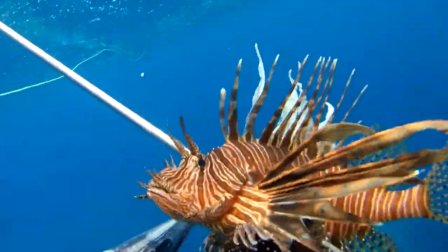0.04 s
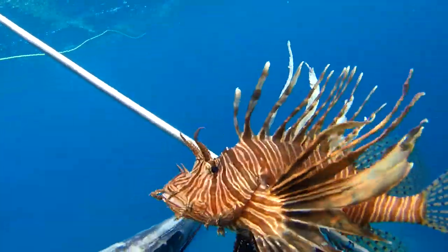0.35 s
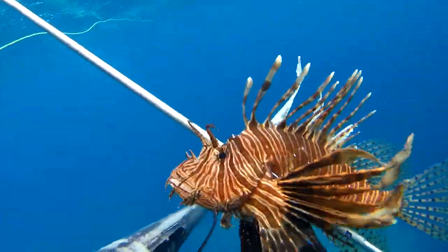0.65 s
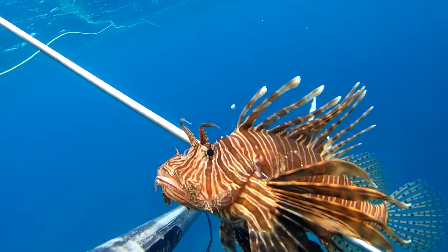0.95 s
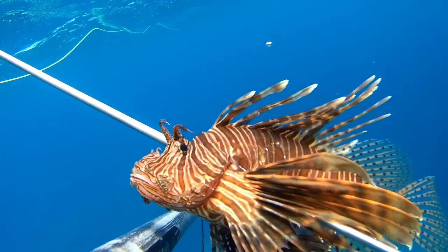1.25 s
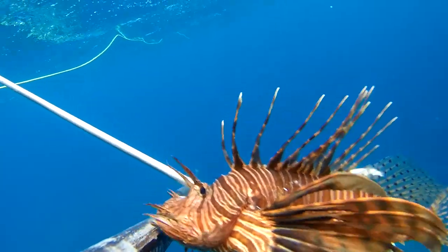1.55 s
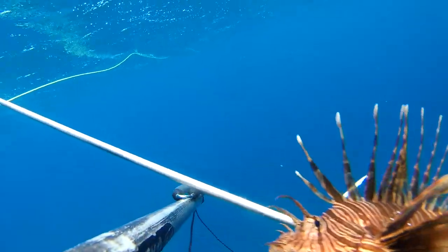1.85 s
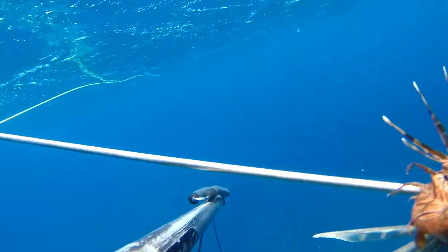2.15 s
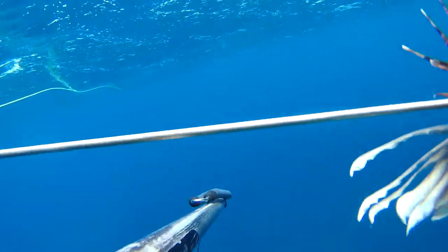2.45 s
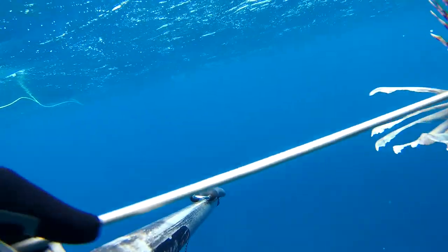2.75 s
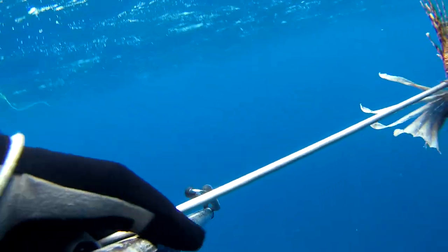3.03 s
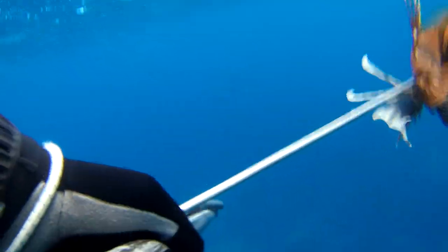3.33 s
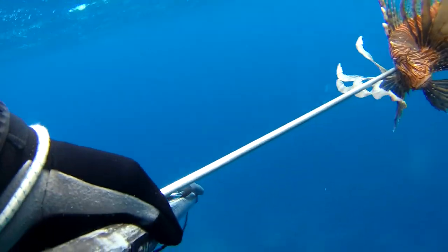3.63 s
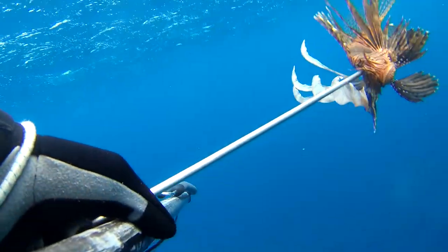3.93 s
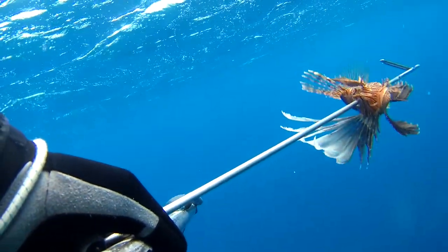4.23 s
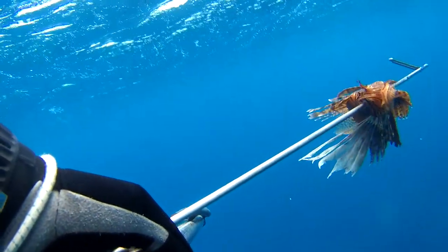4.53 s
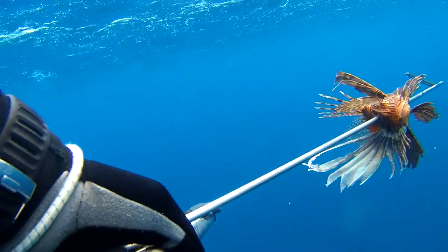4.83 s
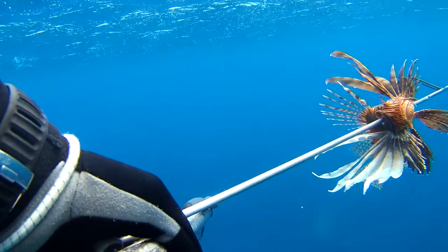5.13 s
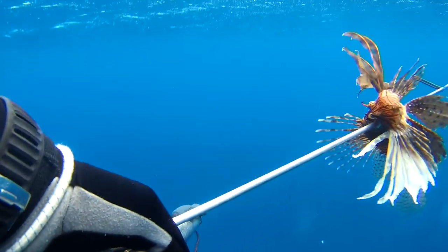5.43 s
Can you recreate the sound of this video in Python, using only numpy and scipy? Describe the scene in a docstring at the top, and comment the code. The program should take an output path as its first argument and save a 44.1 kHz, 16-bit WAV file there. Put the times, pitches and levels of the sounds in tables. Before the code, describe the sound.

The sound is close and muffled, heard under water from inside a camera housing, with a soft wash of water throughout. A handled speargun gives separate short, slightly ringing knocks at about 0.2, 1.2, 1.7 and 2.5 seconds, with faint rubbing between. At 2.8 and 2.9 seconds a steel spear clanks twice on the gun and starts scraping along it in small gritty slips with brief creaks. The water swells from 3 to 4 seconds. At 3.3 seconds comes the loudest knock, briefly overloading the microphone, with a deep thump and wobble from the camera mount. Quick knocks, scrapes, low thuds and a few bright clicks continue until about 4.2 seconds. A small bubble blips at 4.4. Another cluster of hard, dry clacks runs from 4.5 to 4.9 seconds. Then it eases to faint scraping, with a lighter knock and a low thud near 5.4 seconds.

```python
"""A speargun knocks under water as a diver handles it and a steel spear with a fish on it.
Each knock is a short crack plus the gun's own ringing tones. The spear clanks twice on the gun,
then scrapes along it in many tiny slips. Shoves sway the mount of a nearby camera housing, and the
biggest hits overload the microphone inside. Behind this come a few bright clicks, loose fittings
rattle faintly, three bubbles ring and water washes round the housing."""
import sys
import numpy as np
from scipy import signal
from scipy.fft import rfft, irfft, next_fast_len
from scipy.io import wavfile

SR = 44100
rng = np.random.default_rng(int(sys.argv[2]) if len(sys.argv) > 2 else 0)


def master(y):
    """Save y as 16-bit WAV."""
    cut = np.clip(np.atleast_2d(y).T, -1, 1)
    pcm = np.round(cut * 32767)  # scale
    wavfile.write(sys.argv[1], SR, pcm.astype(np.int16))


N = 246078
T = np.arange(N) / SR

# A mode is a tone that an object rings at. A fade time (t60) is how long a sound takes to drop 60 dB.
# The modes of the gun and of the spear. Each row: pitch in Hz, base fade time in seconds,
# relative level in dB when hit in the middle, relative level in dB when hit at the end.
GUN_MODES = [(125, 0.43, -13.5, -13), (186.3, 0.35, -9, -9.5), (258.8, 0.11, -4.5, 0), (310, 0.1, -7, 0),
             (453.5, 0.24, -5, -5), (561.5, 0.28, -19.5, -15.5), (664, 0.11, -17.5, -5),
             (708.6, 0.064, 0.5, -2), (851.6, 0.068, 5.5, 6.5), (943, 0.067, -0.5, 2),
             (1170, 0.067, -15, 5), (1340, 0.056, 6.5, -20.5), (1420, 0.04, -49, 12.5),
             (1509, 0.045, 10.5, -47), (1600, 0.04, 3, 3.5), (1985, 0.03, 3.5, -4.5),
             (2163, 0.019, 11, -2.5), (2730, 0.034, -6, -9.5), (3068, .21, -19, -28),
             (3780, 0.15, -31.5, -39), (3610, 0.056, -15, -42.5), (4100, 0.043, -18.5, -51.5)]
SPEAR_MODES = [(117, 0.41, -18, -15), (268.6, 0.14, -2, -16.5), (444.5, 0.3, -9.5, -26),
               (552, 0.26, -14.5, -18), (609.4, 0.12, -0.5, -13), (705.3, 0.09, 9.5, -32.5),
               (700.6, 0.038, -19, -0.5), (831.4, 0.13, 1, 6), (1090, 0.037, -24.5, -1),
               (1192, 0.078, 7, -84), (1395, .08, -13.5, -8.5), (1522, 0.096, 6.5, -7),
               (1699, 0.07, -21.5, -2), (1854, 0.049, 7, -28.5), (2022, 0.044, -41.5, 7.5),
               (2100, 0.11, -53.5, -15.5), (2291, 0.026, 0, 3), (2556, 0.035, -10, -21.5),
               (2682, 0.032, -5, -18), (2880, 0.24, -61, -34), (3696, 0.074, -5, -14.5),
               (4000, 0.082, -29.5, -25), (4157, 0.089, -25.5, -27), (5270, 0.13, -41, -45)]
# Knocks on the gun, plus one crack of scraping that breaks through the overload at 3.345 s.
# Each row: start in seconds, level in dB, place (0 middle, 1 end), grip (0 free, 1 tight),
# crack pitch in Hz.
GUN_CRACKS = [(.091, -39, 0.58, 0.67, 1190), (.217, -43, 0.0026, 0.29, 1500),
              (0.2442, -12.5, 0, 0.14, 1430), (.274, -42, 0.89, 0, 1300), (.350, -36.5, 0.35, 0.16, 1360),
              (1.142, -30, 0.32, 0.62, 800), (1.2259, -22, 0.96, 0.0045, 1330),
              (1.329, -38.5, .9, 0.077, 1250), (1.698, -25, 0.93, 0, 1190), (1.822, -42, 0.82, 0.91, 643),
              (2.23, -49.5, 0.96, 0, 1390), (2.274, -47.5, .84, 0, 1390), (2.372, -46.5, 0.52, 0, 1290),
              (2.5191, -15.5, 0.027, 0.11, 1510), (2.555, -39, 0.51, 0, 1300),
              (3.247, -31, 0.91, 0.48, 1560), (3.3139, 6.5, 0.21, 0.39, 1520),
              (3.3451, -5.5, 0.37, 0.88, 1490), (3.363, -5.5, .86, 0.28, 810),
              (3.4205, -20.5, .19, 0.19, 1990), (3.466, -25.5, 0.61, 0.13, 1800),
              (3.565, -11.5, 0.43, 0.37, 1910), (3.6789, -22, .37, 0.068, 1620),
              (3.754, -9.5, 0.27, 0.77, 360), (3.815, -24.5, 0.12, 0.49, 2630),
              (4.046, -20.5, 0, 0.71, 2030), (4.0788, -12.5, 0.44, 0.4, 1600),
              (4.5307, -24.5, 0, 0.78, 2300), (4.5522, -12.5, 1, 0.8, 1270), (4.5984, -6, 0, 1, 884),
              (4.625, -18.5, 0.8, 0.34, 1820), (4.755, -16, 0.18, 0.96, 1750),
              (4.8591, -8, 0.036, 0.96, 620), (4.8669, -2.5, 0.65, 0.68, 1640),
              (4.917, -26.5, 0.77, 1, 530), (5.367, -37, .7, 0.39, 875), (5.4129, -19.5, 0.96, 0.26, 1210)]
# Spear hits: two loud, one faint. Each row: start in seconds, ring level in dB, place (0 middle, 1 end),
# ring time multiplier, crack level in dB, crack pitch in Hz, crack fade time in seconds.
SPEAR_CLANKS = [(2.7932, -4.5, 0.051, 0.79, 2.5, 1790, 0.045), (2.9252, -6, 0.9, 1.04, -14, 1730, 0.073),
                (2.985, -28, 0.6, 2.8, -32.5, 5340, 0.053)]
# Slides of the spear along the gun. Each row: start in seconds, length in seconds, level in dB,
# treble cutoff in Hz (higher when the spear bites harder).
SCRAPE_STROKES = [(1.138, 0.1, -49, 1150), (2.04, 1, -54.5, 1240), (2.8, 0.065, -23, 2010),
                  (2.96, 0.11, -28.5, 2130), (3.103, 0.15, -39, 1770), (3.345, 0.08, -26, 3740),
                  (3.43, 0.085, -41, 2000), (3.485, 0.12, -31, 3060), (3.602, 0.032, -27, 2600),
                  (3.628, 0.041, -30, 4200), (3.668, 0.078, -33, 1490), (3.754, 0.047, -36.5, 4100),
                  (3.846, 0.091, -47.5, 3020), (3.893, 0.078, -33.5, 4400), (3.973, 0.039, -39.5, 3500),
                  (4.039, 0.19, -44, 2620), (4.199, 0.088, -41, 2940), (4.421, 0.093, -43, 2200),
                  (4.5, 0.27, -48.5, 1880), (4.926, 0.19, -53, 2310), (5.043, 0.066, -47.5, 2770),
                  (5.243, 0.068, -51.5, 5420), (5.287, .1, -57, 3080), (5.519, 0.085, -45, 2880)]
# Groans where the grip sticks and slips. Each row: start and length in seconds, level in dB, pitch in Hz.
GRIP_GROANS = [(0, 0.055, -56, 304), (1.134, 0.12, -43, 624), (1.138, 0.088, -56, 2680),
               (1.431, 0.067, -51.5, 593), (2.059, 0.11, -48, 662), (2.18, 0.25, -57.5, 420),
               (2.83, 0.039, -32.5, 255), (2.983, .1, -31, 787), (3.134, 0.034, -30, 780),
               (3.361, .04, -18.5, 495), (3.554, 0.043, -22.5, 445), (3.635, 0.025, -26, 1720),
               (3.894, 0.11, -31, 437), (4.202, 0.093, -46, 900)]
# Shoves on the mount. Each row: start in seconds, level in dB, length of the push in seconds.
MOUNT_SHOVES = [(3.3065, 12, .0115), (3.3455, 1, .018), (3.553, -10, .014), (3.588, -11, .012),
                (3.775, -9, .013), (3.812, -16, .012), (3.975, -16, .018), (4.555, -17, .022),
                (4.599, -19, .004), (4.729, -21, .014), (4.86, -17, .005), (4.872, -17, .018),
                (5.4605, -7, .011)]
# Short, bright clicks; the one at 2.985 s is the sharp edge of the faint spear hit.
# Each row: start in seconds, level in dB.
BRIGHT_CLICKS = [(.364, -46.5), (1.63, -42), (2.736, -46), (2.985, -49), (3.111, -40.5), (3.392, -21),
                 (3.583, -29.5), (4.521, -36), (5.219, -41)]
# Bubbles shaken loose. Each row: start in seconds, level in dB, first pitch in Hz, fade time in seconds.
LOOSE_BUBBLES = [(0.508, -45, 500, 0.013), (0.761, -33.5, 351, 0.045), (4.403, -19, 323, 0.022)]
# How hard the diver's movement drives water past the housing. Each row: time in seconds, strength in dB.
WATER_FLOW = [(0, -18), (.9, -28.5), (1.9, -27), (2.6, -21), (3.0, -7.5), (3.5, -5.5), (4.0, -3.5),
              (4.35, -17), (4.7, -7.5), (5.17, -22), (5.58, -11)]
# The tone colour of each noise. Each row: frequency in Hz, relative level in dB.
RUB_SPECTRUM = [(110, -1.5), (200, 1), (350, -5), (600, -6), (850, 2.5), (1300, -7), (1700, -7.5),
                (2500, -13.5), (3800, -7.5), (4500, -31), (7000, -21.5)]
GRIT_SPECTRUM = [(2500, 12.5), (4200, 0.5), (5700, -3), (6800, -18), (9500, -23.5), (11300, -19),
                 (12500, -26), (16000, -30.5)]
WASH_SPECTRUM = [(70, -54.5), (170, 2), (330, -3.5), (700, -4.5), (1000, -11.5), (2000, -18.5),
                 (3000, -19.5), (4500, -33.5)]
SURGE_SPECTRUM = [(10, -11.5), (25, -2), (40, -12), (65, -23.5), (105, -25.5), (160, -31), (250, -48.5)]
HISS_SPECTRUM = [(1500, -7.5), (2300, -11.5), (3050, -2.5), (3500, -11), (4500, -11.5), (6000, -7.5),
                 (7500, -16.5), (15500, -15.5)]

CRACK_T60_S = 0.033  # fade time of a 1500 Hz crack on the freely ringing gun


def gun_cracks():
    """The tighter the hand holds the gun, the weaker and shorter its ring, down to a dry clack."""
    hits = []
    for start, db, place, grip, crack_hz in GUN_CRACKS:
        ring_db = db - 1.5 - 17 * grip
        ring_length = 0.83 * np.exp(-grip)
        crack_t60 = CRACK_T60_S * (1500 / crack_hz) ** 0.37 * np.exp(-0.76 * grip)  # low cracks linger
        hits.append((start, ring_db, place, ring_length, db, crack_hz, crack_t60))
    return strike(hits, GUN_MODES, rise_s=0.0017, crack_width=0.31, cutoff_hz=3690, leak_db=-35.5)


def spear_clanks():
    """The steel spear hits the gun and rings, with a sharper start than a knock."""
    return strike(SPEAR_CLANKS, SPEAR_MODES, rise_s=0.00077, crack_width=0.64,
                  cutoff_hz=4130, leak_db=-18.5)


def strike(hits, modes, rise_s, crack_width, cutoff_hz, leak_db):
    """Each hit makes a short, noisy crack and rings the modes; where it lands sets their mix."""
    out, t = np.zeros(N), T[:SR // 2]
    hz, t60, middle_db, end_db = np.transpose(modes)[:, :, None]
    waves = np.sin(2 * np.pi * hz * t)
    rise = 1 - np.exp(-(t / rise_s) ** 2)  # the contact takes a moment to build up
    for start, ring_db, place, ring_length, crack_db, crack_hz, crack_t60 in hits:
        weights = amp(ring_db + middle_db + place * (end_db - middle_db))
        ring = np.sum(weights * waves * fade(t, t60 * ring_length), axis=0)
        crack = resonate(rng.standard_normal(len(t)), crack_hz, crack_width * crack_hz)
        treble_db = leak_db + 11.5 * np.log2(CRACK_T60_S / crack_t60)  # shorter cracks are brighter
        muffled = lowpass(crack, cutoff_hz, order=4)  # the housing lets little treble in
        crack = unit(muffled + amp(treble_db) * crack)
        add(out, start, rise * (ring + amp(crack_db) * crack * fade(t, crack_t60)))
    return out


def spear_scrape(slips):
    """Countless tiny slips ring the sliding spear; a harder bite sounds brighter and grittier."""
    out = np.zeros(N)
    # The moving contact favours one mode, then another.
    ringing = unit(sum((-1) ** k * resonate(slips, hz, 56 + hz / 100) * amp(3.5 * drift(per_second=11))
                       for k, (hz, *_) in enumerate(SPEAR_MODES)))
    rubbing = colour(unit(slips) + amp(6.5) * ringing, RUB_SPECTRUM)
    grit = colour(slips, GRIT_SPECTRUM)
    for start, length, db, cutoff_hz in SCRAPE_STROKES:
        span, swell = stroke(start, length)
        rub = unit(lowpass(rubbing[span], cutoff_hz, order=2))
        grit_db = -16 + 11 * np.log2(cutoff_hz / 2955)
        out[span] += amp(db) * swell * (rub + amp(grit_db) * grit[span])
    return out


def grip_groans(slips):
    """The grip sticks and slips, groaning or squeaking around one pitch at a time."""
    out = np.zeros(N)
    for start, length, db, hz in GRIP_GROANS:
        span, swell = stroke(start, length)
        width_hz = 50 + 0.18 * hz
        groan = resonate(resonate(slips[span], hz, width_hz), hz, width_hz)
        out[span] += amp(db) * swell * unit(groan)
    return out


def stroke(start, length):
    """The samples one slide covers, and its swell: louder as it speeds up, softer as it slows."""
    span = (T >= start) & (T < start + length)
    speed = np.interp(np.linspace(0, 1, span.sum()), [0, 0.41, 1], [0, 1, 0])
    return span, unit(speed ** 0.51)


def mount_sway(swing_hz, swing_t60, recoil_s):
    """Each shove is a quick push and a slower recoil, and leaves the mount swinging in the water."""
    out, t = np.zeros(N), T[:SR]
    swing = amp(-15) * np.sin(2 * np.pi * swing_hz * t) * fade(t, swing_t60)
    for start, db, push_s in MOUNT_SHOVES:
        push = np.sin(np.pi * np.clip(t / push_s, 0, 1))
        recoil = 0.28 * np.sin(np.pi * np.clip((t - push_s) / recoil_s, 0, 1))
        add(out, start, amp(db) * (push - recoil + swing))
    return out


def bright_clicks(hz, width_hz, t60):
    """Short, bright clicks, each a tiny burst of noise."""
    out, t = np.zeros(N), T[:SR // 20]
    for start, db in BRIGHT_CLICKS:
        noise = rng.standard_normal(len(t))
        click = unit(resonate(resonate(noise, hz, width_hz), hz, width_hz))
        add(out, start, amp(db) * click * fade(t, t60))
    return out


def loose_fittings(level_db):
    """Loose fittings tick faintly, each on its own mode of the gun, softened by the water."""
    ringing = sum(resonate(grains(per_second=8.4, spread_db=1.5), hz, width_hz=300)
                  for hz, *_ in GUN_MODES if 600 < hz < 2800)
    return amp(level_db) * unit(lowpass(ringing, cutoff_hz=2300, order=6))


def bubbles(glide):
    """Each bubble rings briefly, rising a little in pitch."""
    out, t = np.zeros(N), T[:SR // 8]
    for start, db, hz, t60 in LOOSE_BUBBLES:
        phase = 2 * np.pi * hz * t * (1 + glide * t / t60)
        rise = 1 - np.exp(-hz * t)
        add(out, start, amp(db) * np.sin(phase) * rise * fade(t, t60))
    return out


def water():
    """Flowing water washes by, faintly rings the gun and presses on the housing; a hiss stays steady."""
    flow_db = np.interp(T, *np.transpose(WATER_FLOW))
    eddies = rng.standard_normal(N)
    ringing = unit(sum(resonate(eddies, hz, width_hz=35) * amp(3.5 * drift(per_second=14))
                       for hz, *_ in GUN_MODES))
    wash = amp(-44.5 + 0.57 * flow_db) * colour(eddies + amp(-11.5) * ringing, WASH_SPECTRUM)
    pressure = amp(-17.5 + flow_db) * colour(rng.standard_normal(N), SURGE_SPECTRUM)
    hiss = amp(-69) * colour(rng.standard_normal(N), HISS_SPECTRUM)
    return wash + pressure + hiss


def amp(db):
    """Turn decibels into a number to multiply by."""
    return 10 ** (np.asarray(db) / 20)


def unit(x):
    """Scale x so that its average level (rms) is 1."""
    return x / np.sqrt(np.mean(x ** 2))


def fade(t, t60):
    """A curve that starts at 1 and drops 60 dB every t60 seconds."""
    return np.exp(-np.log(1000) * t / t60)


def add(out, start, x):
    """Mix x into out, beginning at start seconds."""
    i = int(start * SR)
    out[i:i + len(x)] += x[:N - i]


def lowpass(x, cutoff_hz, order):
    """Turn down the treble above the cutoff; a higher order cuts more steeply."""
    return signal.sosfilt(signal.butter(order, cutoff_hz, fs=SR, output="sos"), x)


def resonate(x, hz, width_hz):
    """Keep the part of x near one pitch; a narrower band rings longer."""
    return signal.lfilter(*signal.iirpeak(hz, hz / width_hz, fs=SR), x)


def colour(x, spectrum):
    """Shape the lows and highs of x with a spectrum table, then set its average level to 1."""
    hz, db = np.transpose(spectrum)
    size = next_fast_len(N)
    freqs = np.maximum(np.fft.rfftfreq(size, 1 / SR), 1)
    octaves_outside = np.maximum(np.log2(hz[0] / freqs), 0) + np.maximum(np.log2(freqs / hz[-1]), 0)
    gain = amp(np.interp(np.log(freqs), np.log(hz), db) - 24 * octaves_outside)
    return unit(irfft(rfft(x, size) * gain, size)[:N])


def drift(per_second):
    """A value that glides from one random number to the next, mostly between -1 and 1."""
    points = rng.standard_normal(1024)
    return np.interp(T * per_second, np.arange(len(points)), points)


def grains(per_second, spread_db):
    """Tiny clicks at random times, a few much larger than the rest."""
    sizes = amp(spread_db * np.minimum(rng.exponential(size=N), 5))
    happens = rng.random(N) < per_second / SR
    return unit(happens * sizes * rng.standard_normal(N))


def scene():
    """Add up everything that reaches the one microphone in the housing."""
    hits = gun_cracks() + spear_clanks()
    slips = grains(per_second=2300, spread_db=2) * amp(2.5 * drift(per_second=160))  # a juddering slide
    sliding = spear_scrape(slips) + grip_groans(slips)
    sway = mount_sway(swing_hz=24.66, swing_t60=0.99, recoil_s=0.03)
    rattle = loose_fittings(level_db=-69.5)
    clicks = bright_clicks(hz=4500, width_hz=2250, t60=0.0065)
    background = bubbles(glide=0.078) + water()
    return (hits + sliding + sway + rattle + clicks + background)[None]


def record(dry):
    """The biggest hits overload the microphone and are cut flat; then the highest treble is removed."""
    overload, top_hz = 0.71, 15900
    clipped = np.clip(dry, -overload, overload)
    return signal.sosfilt(signal.ellip(8, 0.2, 70, top_hz, fs=SR, output="sos"), clipped)


dry = scene()
out = record(dry)
master(out)
```